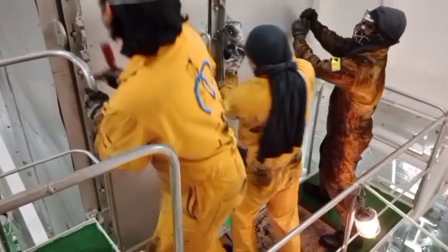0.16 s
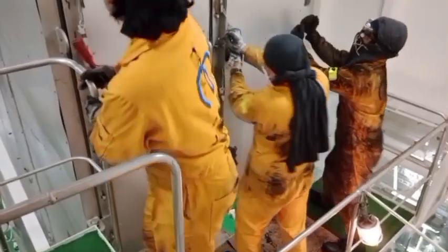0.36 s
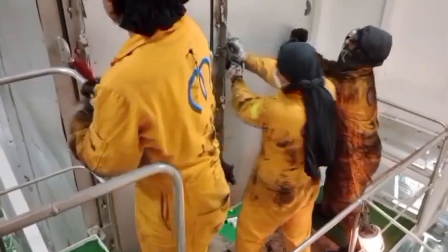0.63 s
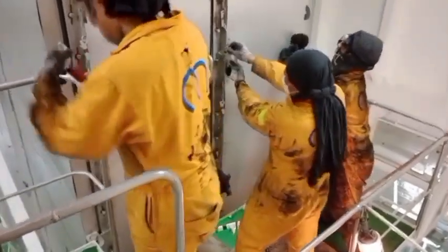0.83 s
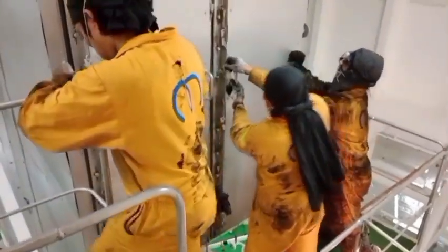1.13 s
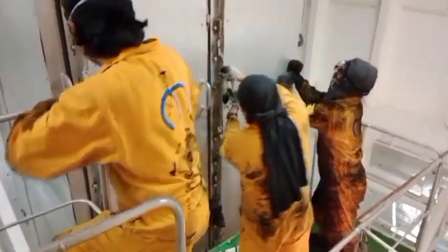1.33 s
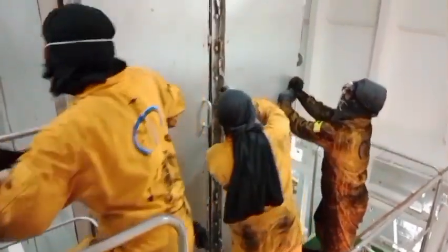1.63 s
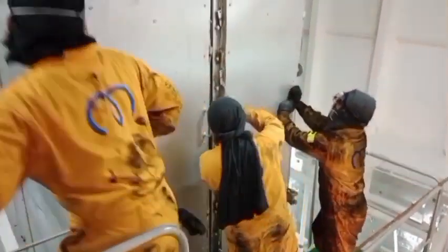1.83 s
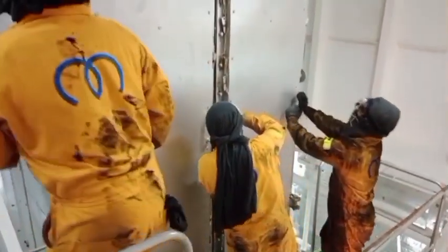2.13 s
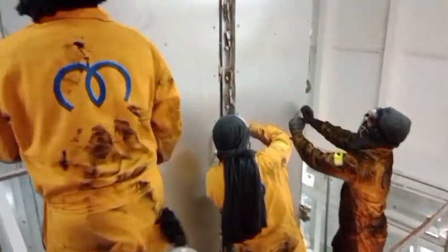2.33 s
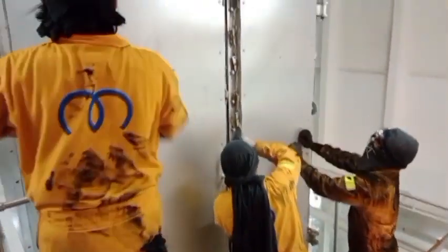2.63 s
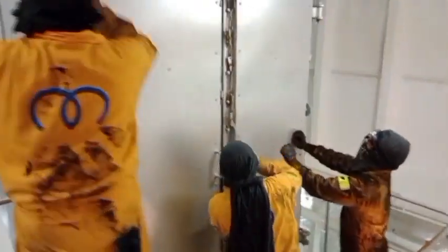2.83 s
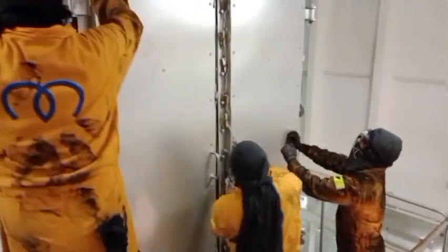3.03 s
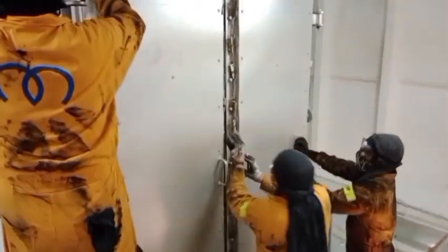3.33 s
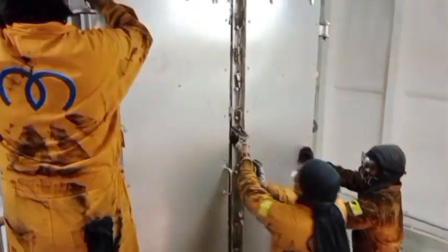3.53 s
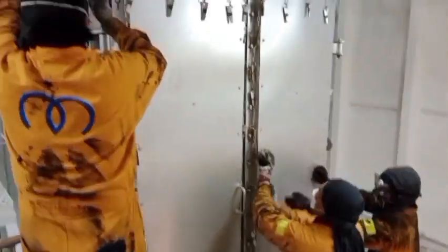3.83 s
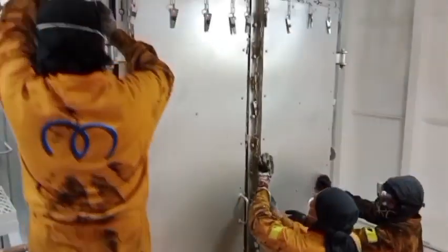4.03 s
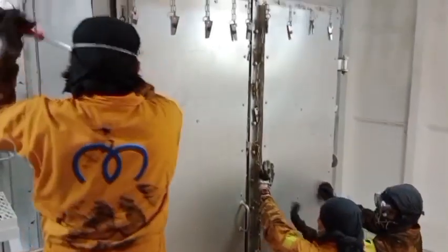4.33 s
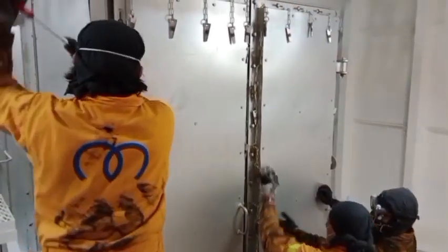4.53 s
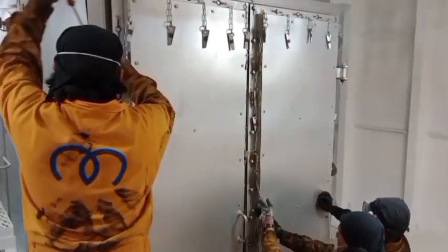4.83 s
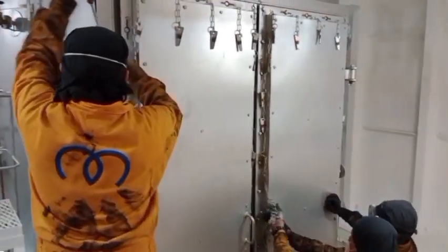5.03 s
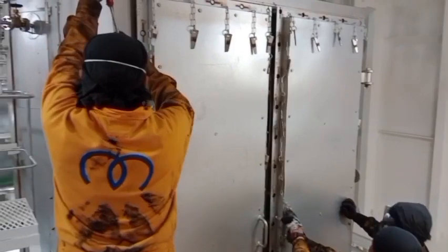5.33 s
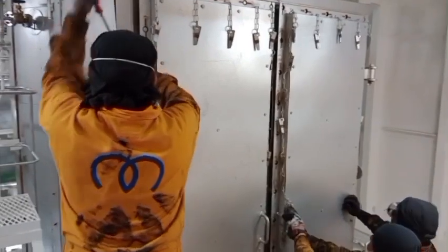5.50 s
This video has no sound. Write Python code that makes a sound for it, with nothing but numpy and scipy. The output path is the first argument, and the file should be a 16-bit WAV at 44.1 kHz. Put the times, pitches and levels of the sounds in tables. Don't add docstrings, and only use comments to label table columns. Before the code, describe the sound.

A generator diesel drones loudly in a steel engine room with a steady gear whine near one kilohertz, fan roar and faint tool pings.

```python
import sys
import numpy as np
from scipy import signal
from scipy.fft import rfft, irfft
from scipy.io import wavfile
from scipy.ndimage import uniform_filter1d, map_coordinates

SR = 44100
rng = np.random.default_rng(int(sys.argv[2]) if len(sys.argv) > 2 else 0)


def bounce(signal):
    frames = np.transpose(np.atleast_2d(signal))
    limited = np.clip(frames, -1, 1)
    pcm = np.round(limited * 32767).astype(np.int16)
    wavfile.write(sys.argv[1], SR, pcm)


def boost_factor(decibels):
    exponent = np.asarray(decibels, float) / 20
    return 10 ** exponent


N = 249650
T = np.arange(N) / SR
CYCLE_HZ = 7.497


def rms_one(x):
    return x / np.sqrt(np.mean(x ** 2) + 1e-20)


def at_hz(points, hz):
    hz_points, db_points = np.transpose(points)
    return np.interp(np.log(hz + 1), np.log(hz_points), db_points, left=-120, right=-120)


def coloured(spectrum, peaks=()):
    hz = np.fft.rfftfreq(N, 1 / SR)
    gain = boost_factor(at_hz(spectrum, hz))
    for peak_hz, width_hz, peak_db in peaks:
        gain = gain * boost_factor(peak_db / (1 + (2 * (hz - peak_hz) / width_hz) ** 2))
    return rms_one(irfft(rfft(rng.standard_normal(N)) * gain, N))


# (frequency [Hz], density [dB per Hz])
AIR_LEAKS = [(4750, -30.5), (5100, -15.5), (5500, -6.5), (6300, -2.5), (7400, 2.5), (8400, 1), (8900, -4),
             (9300, -14.5), (10900, -18), (11500, -21.5), (13300, -20.5), (13700, -31.5), (15400, -29),
             (15600, -46)]


def air_hiss():
    return boost_factor(-60.4) * coloured(AIR_LEAKS)


# (frequency [Hz], density [dB per Hz])
FAN_ROAR = [(20, -34), (60, -13), (124, -1), (158, -1.5), (205, -16.5), (254, -5.5), (376, -8), (661, -11),
            (1070, -5.5), (1680, -9.5), (2700, -17), (3200, -19.5), (3750, -22), (4100, -32.5),
            (4400, -43.5), (4750, -57.5)]
# (frequency [Hz], width [Hz], level [dB])
DUCT_MODES = [(120, 4.2, -0.5), (154, 18, -0.5), (269, 16, 2), (378, 30, 2.5), (1053, 17, -10.5),
              (1096, 84, 3.5), (1680, 33, 6), (2044, 22, 5.5), (1983, 14, 2), (2413, 35, 6.5),
              (2630, 127, 6), (2843, 37, 11)]


def fan_roar():
    return boost_factor(-38) * coloured(FAN_ROAR, DUCT_MODES)


# (time [s], peak level [dB], frequency [Hz], 60 dB decay [s])
TOOL_PINGS = [
    (3.136, -60, 10882, .45),
    (5.005, -63, 8924, .7),
    (5.548, -64, 10808, .5),
    (0.81, -78, 10820, .4),
    (2.66, -77, 10850, .4),
]
# (time [s], rms level [dB], length [s])
TOOL_SCUFFS = [
    (3.13, -74, .06),
    (3.88, -81, .1),
    (4.235, -75, .05),
    (5.37, -76, .025),
    (5.39, -70, .045),
    (5.43, -70, .075),
    (5.54, -79, .04),
]


def hand_tool():
    out = np.zeros(N)
    for start, peak_db, hz, t60 in TOOL_PINGS:
        age = np.maximum(T - start, 0)
        onset = 1 - np.exp(-age / 0.0032)
        out += boost_factor(peak_db - 60 * age / t60) * onset * np.sin(2 * np.pi * hz * age)
    bright = coloured([(6000, -4), (9500, 0), (13000, -1), (14000, -11), (15400, -12)])
    grit = coloured([(30, 0), (250, 0)])
    for start, rms_db, length in TOOL_SCUFFS:
        progress = np.clip((T - start) / length, 0, 1)
        stroke = np.sin(np.pi * progress ** 0.44)
        out += boost_factor(rms_db + 3.0 * grit) * bright * stroke
    return out


# (time [s], level [dB])
BLADE_LEVEL = [(0, -82), (.6, -82), (1.4, -80), (2.2, -86), (2.7, -81), (3.2, -75), (3.9, -82), (4.5, -77),
               (5.2, -85), (5.66, -75)]
# (time [s], frequency [Hz])
BLADE_HZ = [
    (0, 5410),
    (2.4, 5410),
    (2.6, 5430),
    (5.66, 5438),
]


def turbocharger():
    hz = np.interp(T, *np.transpose(BLADE_HZ)) + 9.0 * coloured([(2, 0), (30, 0)])
    phase = 2 * np.pi * np.cumsum(hz) / SR
    flutter_db = 4.2 * coloured([(3, 0), (15, 0)])
    blade_db = np.interp(T, *np.transpose(BLADE_LEVEL)) + flutter_db
    octave_db = -101 + 1.5 * T + 3.8 * coloured([(3, 0), (25, 0)])
    blade = boost_factor(blade_db) * np.sin(phase)
    octave = boost_factor(octave_db) * np.sin(2 * phase)
    blower = boost_factor(-82) * np.sin(phase * 1.22)
    return np.sqrt(2) * (blade + octave + blower)


# (time [s], level [dB])
MESH_LEVEL = [(0, -44), (.7, -44), (1.6, -42), (2.4, -41.5), (3.2, -43), (3.7, -40), (4.4, -43),
              (5.2, -44.5), (5.66, -44.5)]


def walked_orders(s):
    upper_swing = np.cos(2 * np.pi * (s - 2.8) / 1.75)
    lower_swing = np.cos(2 * np.pi * (s - 3.55) / 3.7)
    return {142: boost_factor(np.interp(s, *np.transpose(MESH_LEVEL))),
            63: boost_factor(-58.5 + 2 * s),
            148: boost_factor(-53 + 7 * upper_swing),
            136: boost_factor(-56 + 7 * lower_swing)}


# (multiple of the cycle rate [count], rms level [dB])
STRONG_ORDERS = [(12, -53.8), (15, -56.6), (16, -50.9), (18, -56.9), (21, -52.5), (22, -57.3), (34, -55.5),
                 (35, -56.8), (41, -57.1), (46, -55.6), (47, -57.1), (49, -53.8), (51, -55.9), (53, -56.1),
                 (54, -56.5), (63, -51.5), (78, -57.0), (99, -53.7), (127, -56.3), (136, -52.9),
                 (141, -52.2), (142, -42.7), (145, -54.7), (148, -50.6), (149, -57.0), (150, -55.8),
                 (151, -53.8), (162, -57.1), (164, -57.1), (169, -55.5)]
# (frequency [Hz], rms level [dB])
ORDER_COMB = [(40, -90), (70, -80), (130, -68.5), (210, -68), (320, -66.5), (500, -64), (750, -67),
              (1050, -62), (1400, -69.5), (1900, -66.5), (2400, -72.5), (2900, -75), (3700, -86.5)]


def diesel_engine():
    size, count = 16384, 500
    phase = T * CYCLE_HZ
    cycles = int(phase[-1]) + 2

    uneven = np.clip(rng.standard_normal(count), -3, 1)
    levels = at_hz(ORDER_COMB, np.arange(count) * CYCLE_HZ) + 6.5 * uneven
    wander = 0.46 * (1 + np.arange(count) / 400.0)
    for multiple, rms_db in STRONG_ORDERS:
        levels[multiple] = rms_db
        wander[multiple] *= .65

    shape = (cycles + 20, count)
    steps = rng.standard_normal(shape) + 1j * rng.standard_normal(shape)
    drift = signal.lfilter([1], [1, -0.77], steps, axis=0)[20:]
    drift = rms_one(drift.view(float)).view(complex)
    orders = boost_factor(levels) * (1 + wander * drift) / np.sqrt(1 + 2 * wander ** 2)
    for multiple, level in walked_orders(np.arange(cycles) / CYCLE_HZ).items():
        orders[:, multiple] = level
    orders = orders * np.exp(2j * np.pi * rng.random(count))

    waveforms = irfft(orders, size) * size / np.sqrt(2)
    return map_coordinates(waveforms, [phase, phase % 1 * size], order=1, mode="grid-wrap")


def scene():
    background = air_hiss() + fan_roar()
    return (background + hand_tool() + turbocharger() + diesel_engine())[None]


# (frequency [Hz], level [dB])
AUDIBILITY = [(20, -18), (4400, -15), (5200, -17), (6000, -13), (7000, -14), (9500, -21), (11000, -22),
              (11400, -20), (12000, -22), (13000, -24), (13800, -30), (14200, -32.5), (15500, -32),
              (22050, -32)]


def spectral_gate(x):
    hz, _, cells = signal.stft(x, SR, nperseg=2048, noverlap=1024)
    width = 8
    band = np.minimum(np.arange(len(hz)) // width, (len(hz) - 1) // width - 1)
    power = (abs(cells[:-1]) ** 2).reshape(-1, width, cells.shape[1]).mean(axis=1)
    power = uniform_filter1d(power, size=2, axis=1)
    hiss_peak = (abs(cells[(hz > 7000) & (hz < 8000)]) ** 2).mean()
    waver = rms_one(uniform_filter1d(rng.standard_normal(power.shape), size=3, axis=1))
    line_db = at_hz(AUDIBILITY, hz[width // 2::width])[:, None] + 2.5 * waver
    heard = power > hiss_peak * boost_factor(line_db) ** 2
    return signal.istft(cells * heard[band], SR, nperseg=2048, noverlap=1024)[1][:N]


def top_cut(x):
    return signal.sosfilt(signal.butter(12, 15530, fs=SR, output="sos"), x)


def record(dry):
    gated = spectral_gate(dry[0])
    return top_cut(gated[None])


dry = scene()
out = record(dry)
bounce(out)
```